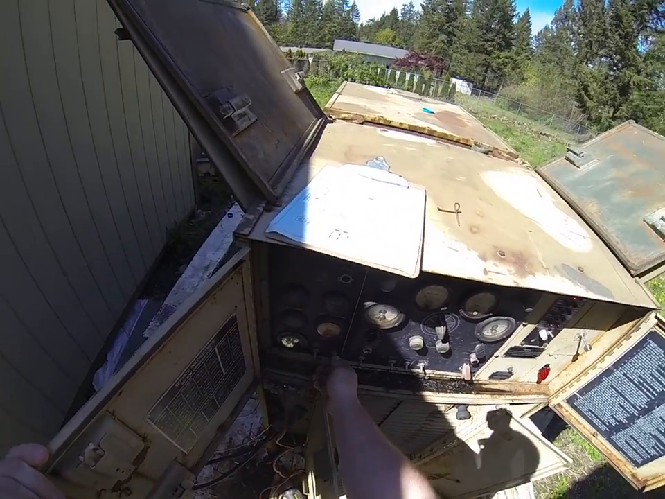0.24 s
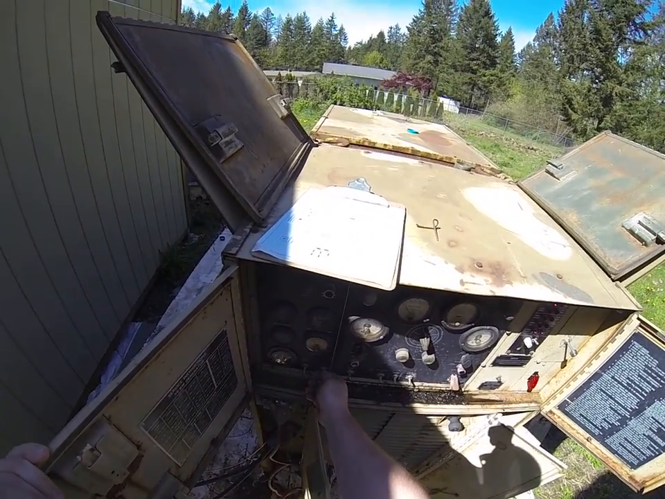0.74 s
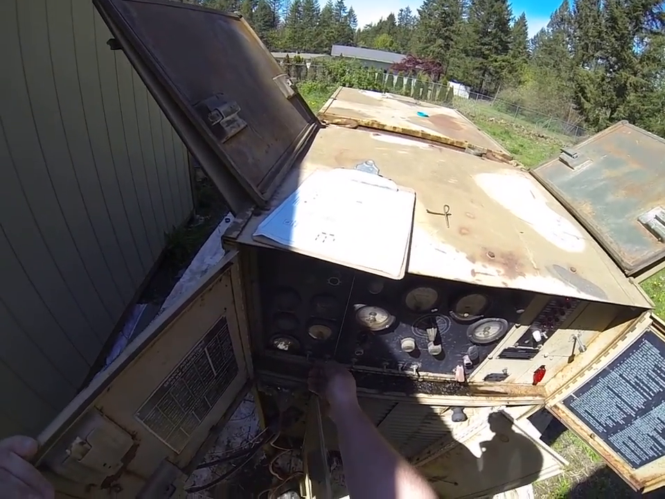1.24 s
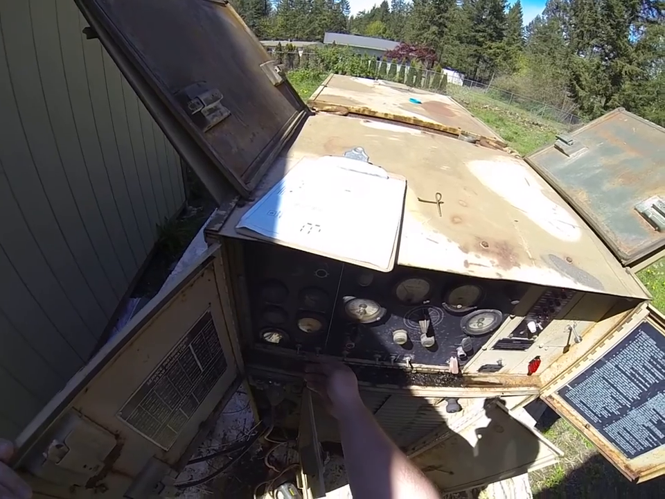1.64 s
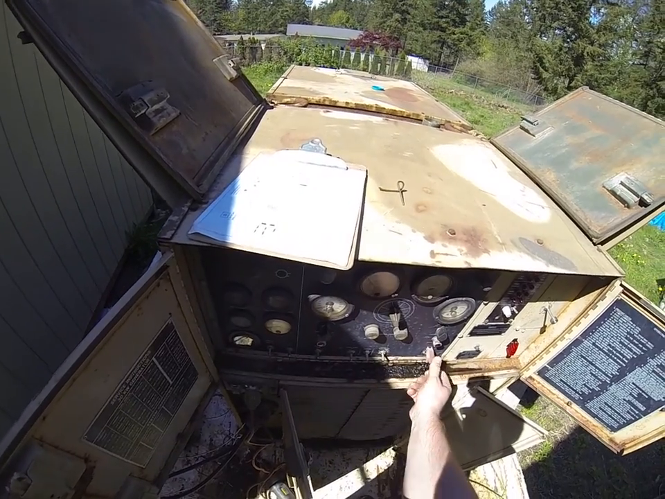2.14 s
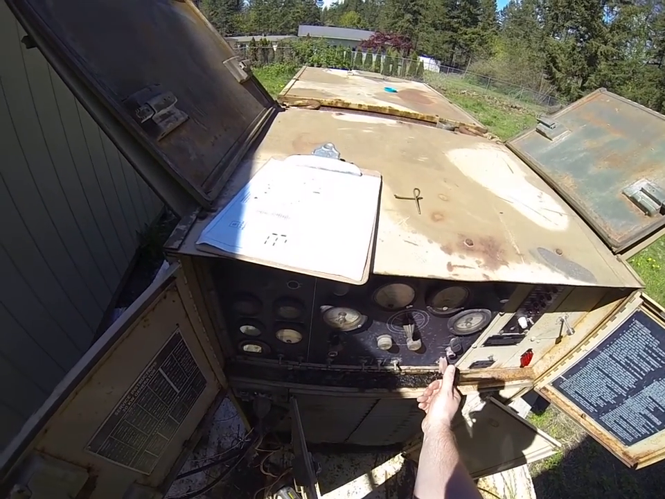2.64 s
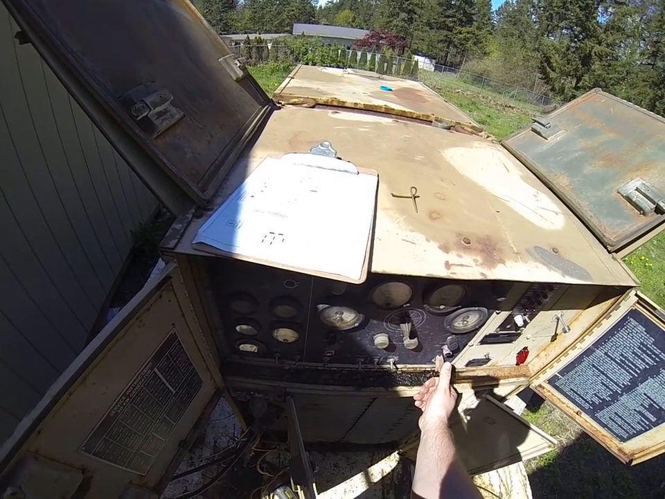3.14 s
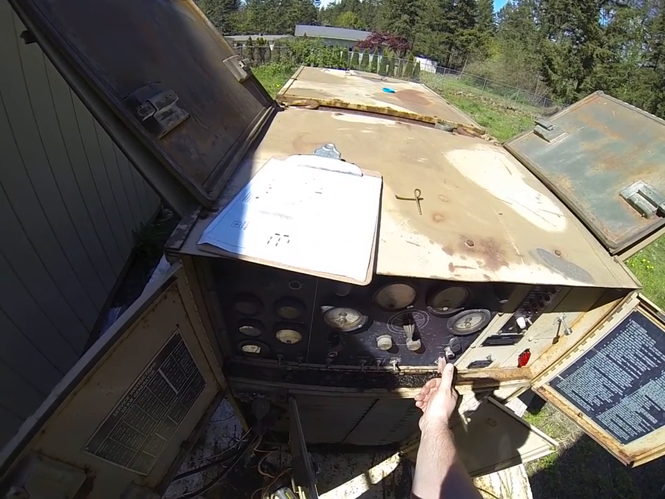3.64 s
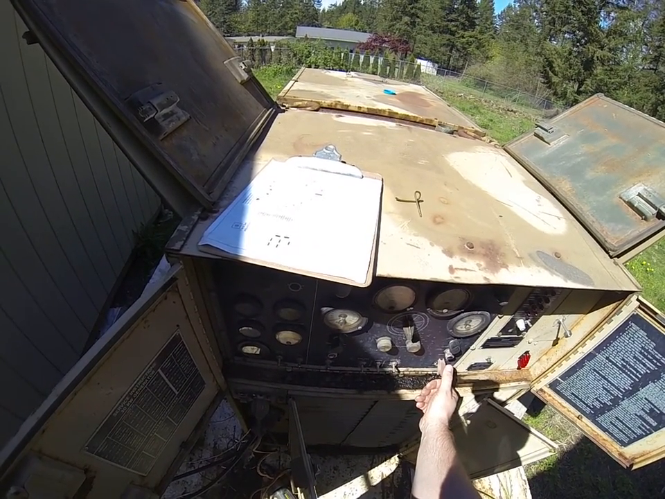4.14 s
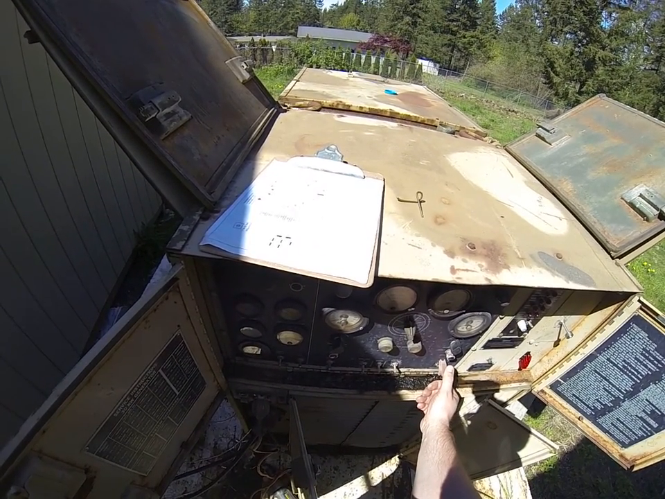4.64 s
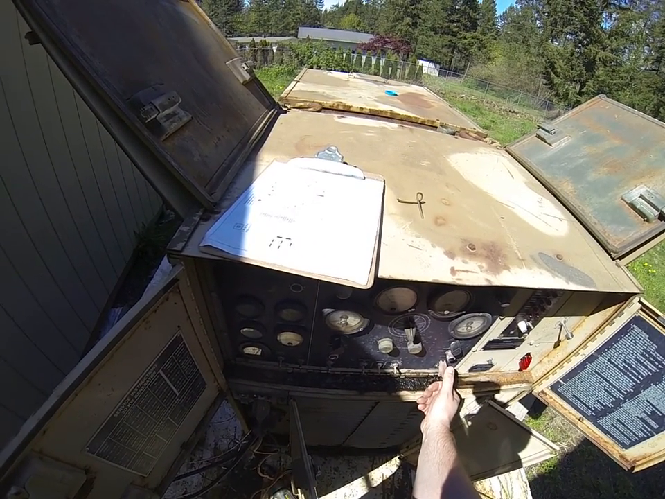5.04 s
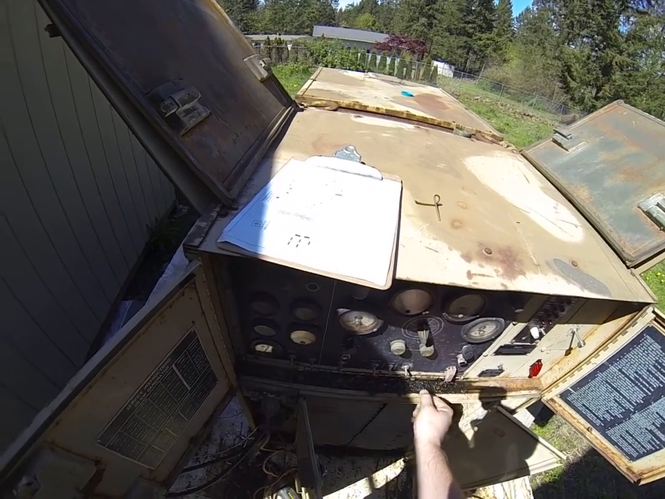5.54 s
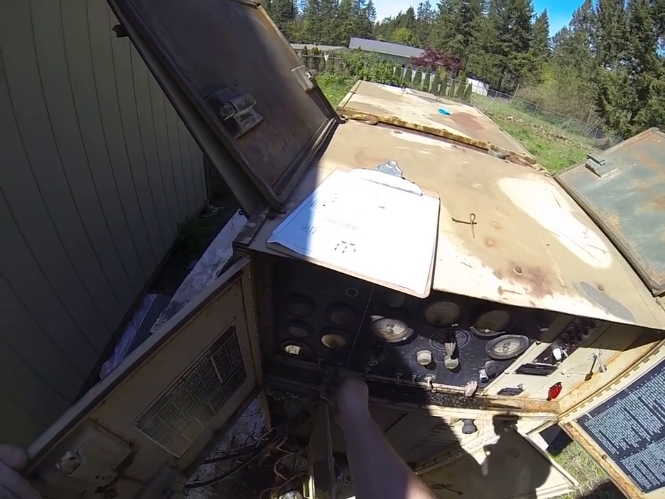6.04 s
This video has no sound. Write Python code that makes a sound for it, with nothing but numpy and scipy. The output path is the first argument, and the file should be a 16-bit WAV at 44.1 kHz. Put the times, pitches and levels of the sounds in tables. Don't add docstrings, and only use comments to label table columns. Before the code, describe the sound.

Wind thumps on a camera housing outdoors while a pump plunger knocks and squeaks, a metal switch snaps, and a starter begins grinding at the end.

```python
import sys
import numpy as np
from scipy import signal
from scipy.fft import rfft, irfft
from scipy.io import wavfile
from scipy.ndimage import uniform_filter1d

SR = 44100
rng = np.random.default_rng(int(sys.argv[2]) if len(sys.argv) > 2 else 0)


def dump(signal):
    limited = np.clip(np.atleast_2d(signal).T, -1, 1)
    pcm = np.round(limited * 32767).astype(np.int16)
    wavfile.write(sys.argv[1], SR, pcm)


def invert_db(level):
    return 10 ** (np.asarray(level, dtype=float) / 20)


N = 277389

# f/Hz, level/dB
WHISTLE = [(6443, -68), (12886, -63)]
# f/Hz, level/dB
AIR_COLOUR = [(52, -29), (88, 2.5), (269, -6), (471, -10.5), (1110, -14), (1860, -18.5), (5820, -27.5),
              (15000, -35)]
# f/Hz, width/Hz, level/dB
CAVITY = [(1220, 134, -72.5), (1430, 100, -76.5), (1294, 180, -76), (7500, 500, -87.5)]
# t/s, level/dB
BREEZE = [(0.0, -42.5), (0.2, -39.5), (0.6, -47), (1.0, -48.5), (1.6, -46.5), (2.4, -50), (3.3, -53.5),
          (4.0, -51), (4.7, -56.5), (5.3, -53.5), (5.8, -49.5), (6.29, -49)]
# crest t/s, level/dB, swell/s, upper rumble relative level/dB
GUSTS = [(0.26, -33, 0.082, -10), (0.389, -22, 0.027, -14), (0.5, -42, 0.041, -6), (0.58, -39, 0.045, -19),
         (0.77, -42, 0.039, -17), (0.98, -43, 0.012, -10), (1.17, -41, 0.012, -12), (1.31, -35.5, .03, -32),
         (1.41, -42.5, 0.026, -8), (2.05, -45.5, 0.029, -22), (2.3, -46.5, 0.086, -6),
         (2.63, -38.5, 0.084, -7.5), (3.24, -48, 0.076, 2), (3.81, -40, 0.051, -8), (4.0, -57, 0.029, 1),
         (4.11, -48, 0.012, 5), (4.41, -39.5, 0.041, -17.5), (5.0, -36, 0.056, -11),
         (5.17, -51.5, 0.036, 2), (5.41, -49, 0.018, -1.5), (5.57, -38, 0.071, -17),
         (5.74, -48, .04, -12.5), (6.09, -37.5, 0.045, -10), (6.17, -40, .03, -14), (6.28, -37, .03, -12)]
# f/Hz, width/Hz
RUMBLE = [(23, 28), (58, 45)]
# seated t/s, first squeak level/dB, second squeak level/dB
SQUEAKS = [(0.339, -65, -60), (2.277, -60, -58.5), (3.538, -65, -61), (4.653, -63, -63), (5.791, -66, -80)]
# seated t/s, peak level/dB, first knock relative level/dB, rattle length/s
STROKES = [(0.337, -53, 3, 0.021), (0.524, -51, -25, 0.026), (1.177, -47, 0, 0.019),
           (1.789, -44, -4.5, 0.012), (2.275, -50.5, 0, .018), (2.411, -46, -4.5, .015),
           (3.029, -45.5, -4.5, 0.015), (3.535, -48, -4.5, .014), (3.65, -43, -9, .013),
           (4.2526, -44, -8, .013), (4.651, -47.5, -4.5, 0.016), (4.87, -46.5, -13, 0.018),
           (5.7896, -61, 13.5, 0.0094)]
# f/Hz, level/dB, t60/s
PANEL_LOW = [(1236, -14, 0.058), (1229, -6, 0.09), (1404, -4, 0.031), (1480, 3, 0.037), (1592, -4.5, 0.076),
             (1745, -27.5, 0.014), (2160, -6, 0.024)]
# f/Hz, level/dB, t60/s
PANEL_HIGH = [(2780, 0.5, 0.01), (3195, -0.5, 0.014), (3470, 3.5, 0.014), (3710, -10, 0.025),
              (4600, -13, 0.0081)]
# t/s, low body peak level/dB, then relative to it high body level/dB,
# bright tick level/dB, diffuse tail level/dB, plate ring level/dB
TICKS = [
    (0.5116, -52, -3, 10.4, 0.5, -36),
    (1.1506, -41, 3.5, 5, -4, -40),
    (0.525, -60, -3, 7.4, -5, -36),
    (6.147, -47.5, -12, 3, -4.5, -38),
    (6.157, -52, 2, 3, -6.5, -38),
]
LEVER = [
    (5.3639, -40.5, 16.2, 2.6, -0.5, -1.4),
]
SNAPS = [
    (5.4105, -7, 0, -14.5, -15, -19.5),
]
# f/Hz, width/Hz
TICK_BODY = [(2900, 670), (3850, 600)]
# f/Hz, width/Hz, level/dB
TICK_TOP = [(1440, 480, 2.5), (5100, 860, -9.5), (6700, 680, -1.5), (8100, 780, -8.5), (10500, 3000, -15.5)]
# f/Hz, width/Hz
SNAP_BODY = [(2250, 304), (3480, 370)]
# f/Hz, width/Hz, level/dB
SNAP_TICK = [(4900, 510, -6), (5560, 460, 1.5), (6370, 480, 4.5), (8040, 770, -6), (11000, 2300, -14.5)]
# f/Hz, width/Hz, level/dB
CABINET = [(400, 1030, -17.5), (1366, 520, 0), (2190, 600, -2), (3280, 400, -0.5), (5110, 950, -9),
           (5700, 400, -10), (7000, 1700, -21.5)]
# f/Hz, level/dB, t60/s
LEVER_RING = [(1520, -3, .12), (2280, -10, .04), (5050, -12, .05)]
# f/Hz, level/dB, t60/s
SNAP_RING = [(345, -16, .08), (684, -21, .1), (1332, -13, .07), (1604, -12, .15), (2056, -4, .09),
             (2283, -18, .38), (2455, -9, .06), (2750, -5, .04), (3236, -9, .05), (3497, -8, .06),
             (4480, -23, .2), (5022, -11, .055), (5717, 0, .085)]
# t/s, level/dB
EFFORT = [(6.14, -80), (6.156, -60), (6.178, -60), (6.186, -42.5), (6.2, -37), (6.208, -28.5),
          (6.236, -27.5), (6.25, -32), (6.29, -32)]
# f/Hz, width/Hz, level/dB
CASING = [(680, 310, -2.5), (1040, 98, 1), (1290, 120, 0.5), (1440, 80, 4.5), (1525, 86, 4),
          (2140, 89, -1.5), (2580, 210, -4.5), (3400, 92, -4), (3870, 400, -28), (4960, 210, -14),
          (6600, 800, -30)]
# f/Hz, width/Hz, level/dB
BLOCK = [(60, 56, 0.5), (136, 30, 0), (225, 45, 0), (304.3, 52, 0), (418, 140, -5)]


def set_level(x, db):
    return x * invert_db(db) / np.sqrt(np.mean(x ** 2))


def curve(table):
    t, db = np.transpose(table)
    return np.interp(np.arange(N) / SR, t, db)


def noise():
    return rng.standard_normal(N)


def walk(rate):
    hold = int(SR / rate)
    steps = np.repeat(rng.standard_normal(N // hold + 1), hold)
    return uniform_filter1d(uniform_filter1d(steps, hold), hold)[:N]


def bursts(times, dbs, rises, decays):
    out = np.zeros(N + SR)
    t = np.arange(SR // 5) / SR
    for s, db, rise, decay in np.broadcast(times, dbs, rises, decays):
        out[int(s * SR):][:len(t)] += invert_db(db) * (1 - np.exp(-t / rise)) * np.exp(-t / decay)
    return out[:N]


def band(x, hz, width):
    return signal.lfilter(*signal.iirpeak(hz, hz / width, fs=SR), x)


def steep(x, hz, width):
    return band(band(x, hz, width), hz, width)


def ring(x, modes):
    out = 0
    for hz, db, t60 in modes:
        pole = np.exp((2j * np.pi * hz - np.log(1000) / t60) / SR)
        out = out + invert_db(db) * signal.lfilter([0, pole.imag], [1, -2 * pole.real, abs(pole) ** 2], x)
    return out


def sensor():
    frame_hz, read_start, read_share = 47.953, .69, .385
    frames = np.arange(N) / SR * frame_hz - read_start + 1
    frame, place = frames.astype(int), frames % 1
    gate = uniform_filter1d(1. * (place < read_share), size=48)
    slips = np.repeat(rng.integers(0, 4, 40), 9) + (rng.random(360) < .15)
    turn = np.cumsum(slips)[frame] / 4
    leak = set_level(steep(noise(), 7600, 1400), -84.5)
    for k, (hz, db) in enumerate(WHISTLE):
        phase = 2 * np.pi * (hz * place / frame_hz + (k + 1) * turn)
        leak = leak + invert_db(db + 1.4 * walk(12)) * np.sin(phase)
    return gate * leak


def air():
    hz, db = np.transpose(AIR_COLOUR)
    colour = invert_db(np.interp(np.log(np.fft.rfftfreq(N, 1 / SR) + 1), np.log(hz), db))
    hiss = set_level(irfft(rfft(noise()) * colour, N), -62)
    cavity = sum(invert_db(1.5 * walk(5.4)) * set_level(band(noise(), f, w), d) for f, w, d in CAVITY)
    return hiss + cavity


def rumble(hz, width):
    x = steep(noise() * invert_db(4.8 * walk(26)), hz, width)
    return set_level(x / uniform_filter1d(np.abs(x), size=5000) ** .5, 0)


def wind():
    crest, db, swell, upper_db = np.transpose(GUSTS)[:, :, None]
    fade_s, breeze_upper_db, top_hz = 0.014, -4, 60.8
    coarse = np.arange(0, N, SR // 500) / SR
    gusts = invert_db(db) * np.exp(np.minimum((coarse - crest) / swell, (crest - coarse) / fade_s))
    t = np.arange(N) / SR
    deep_gust = np.interp(t, coarse, gusts.sum(axis=0))
    upper_gust = np.interp(t, coarse, (gusts * invert_db(upper_db)).sum(axis=0))
    breeze = invert_db(curve(BREEZE))
    deep, upper = (rumble(hz, width) for hz, width in RUMBLE)
    push = (breeze + deep_gust) * deep + (invert_db(breeze_upper_db) * breeze + upper_gust) * upper
    return signal.sosfilt(signal.butter(5, top_hz, fs=SR, output="sos"), push)


def squeaks(travel_s):
    seated, first_db, second_db = np.transpose(SQUEAKS)
    barrel_db = second_db + 21.5 - 2.5
    barrel = steep(noise() * bursts(seated, barrel_db, 0.0046, 0.027), 660, 120)
    first = steep(noise() * bursts(seated - travel_s, first_db + 17, 0.0019, 0.0053), 5290, 600)
    second = steep(noise() * bursts(seated, second_db + 17, 0.0019, 0.0053), 6940, 600)
    return barrel + first + second


def plunger(travel_s):
    seated, seat_db, first_db, length = np.transpose(STROKES)
    t = np.r_[seated - travel_s, seated]
    db = np.r_[seat_db + first_db, seat_db]
    length = np.r_[length, length]
    swing_s = np.repeat((0.0053, 0.0073), len(seated))
    bright_db = np.repeat((-22, -21.5), len(seated))
    dull = ring(noise() * bursts(t, db - 24.5, swing_s, length), PANEL_LOW)
    clicks = bursts(t - .004, db + bright_db - 11.5, 0.0045, 1.12 * length)
    bright = ring(noise() * clicks, PANEL_HIGH)
    return band(dull, 1390, 970) + band(bright, 5230, 6400)


def snaps(events, bodies, tops, rings):
    t, db, high_db, tick_db, tail_db, ring_db = np.transpose(events)
    low, high, plate = (bursts(t, db + d, .00002, .00004) for d in (29, 29 + high_db, ring_db))
    body = steep(low, *bodies[0]) + steep(high, *bodies[1])
    bounce = noise() * bursts(t, db + tick_db + 12, .001, .0015)
    tick = sum(invert_db(d) * steep(bounce, hz, width) for hz, width, d in tops)
    early = bursts(t, db + tail_db + 11, 0.0018, 0.0089)
    late = bursts(t, db + tail_db - 7.5, 0.0048, 0.04)
    scatter = noise() * (early + late)
    tail = sum(invert_db(d) * steep(scatter, hz, width) for hz, width, d in CABINET)
    return body + tick + tail + band(ring(plate, rings), 2750, 8000)


def starter():
    tooth_hz, full_db, block_lag_s = 261.5, -30, 0.011
    grind_db = curve(EFFORT)
    thump_db = -29.5 + 1.06 * (grind_db - full_db)
    hiss_db = -47.5 + 0.55 * (grind_db - full_db)
    follow = 1 / (block_lag_s * SR)
    thump = signal.lfilter([follow], [1, follow - 1], invert_db(thump_db))
    on = np.arange(N) > EFFORT[0][0] * SR
    mesh = 1 + 0.21 * np.cos(2 * np.pi * np.cumsum(tooth_hz / SR * invert_db(3 * walk(150))))
    casing = 0
    for hz, width, db in CASING:
        clumps = mesh * noise() * invert_db(2.7 * walk(90))
        casing = casing + set_level(band(clumps, hz, width), db)
    grind = set_level(steep(casing, 1070, 7300), 0)
    block = set_level(sum(set_level(steep(noise(), hz, width), db) for hz, width, db in BLOCK), 0)
    brushes = set_level(steep(mesh * noise() * invert_db(3.4 * walk(60)), 2400, 5400), 0)
    return on * (invert_db(grind_db) * grind + thump * block + invert_db(hiss_db) * brushes)


def scene():
    travel_s = .0295
    bed = sensor() + air() + wind()
    pump = squeaks(travel_s) + plunger(travel_s)
    ticks = snaps(TICKS, TICK_BODY, TICK_TOP, LEVER_RING)
    lever = snaps(LEVER, SNAP_BODY, SNAP_TICK, LEVER_RING)
    toggle = snaps(SNAPS, SNAP_BODY, SNAP_TICK, SNAP_RING)
    return (bed + pump + ticks + lever + toggle + starter())[None]


def top_cut(x):
    return signal.sosfilt(signal.butter(12, 15130, fs=SR, output="sos"), x)


def record(dry):
    top_hz = 15050
    dull = signal.sosfilt(signal.ellip(8, .2, 60, top_hz, fs=SR, output="sos"), dry)
    return top_cut(dull)


dry = scene()
out = record(dry)
dump(out)
```